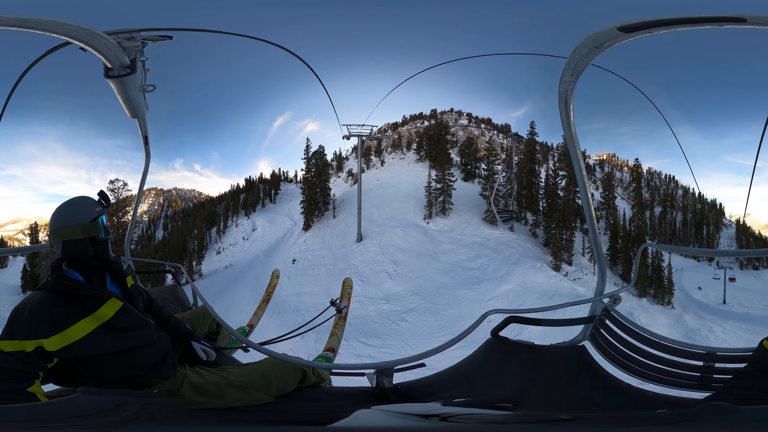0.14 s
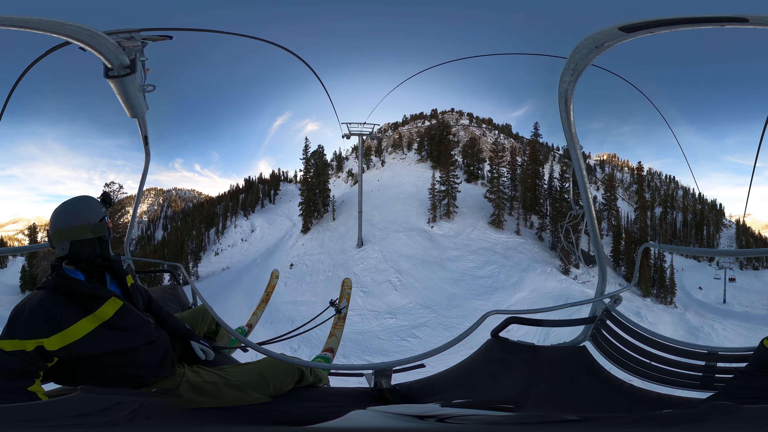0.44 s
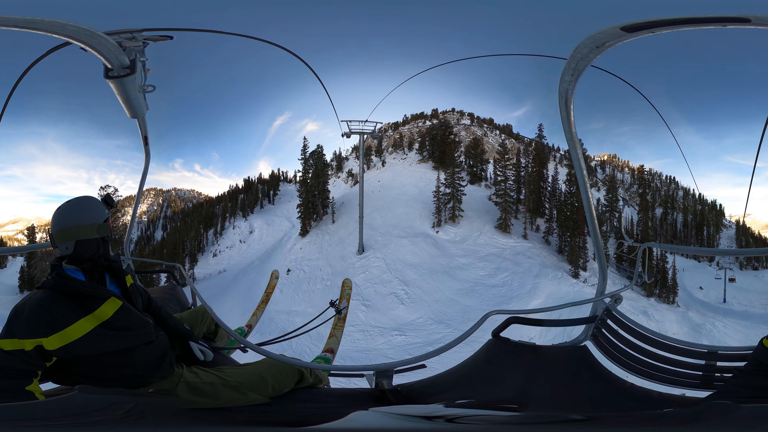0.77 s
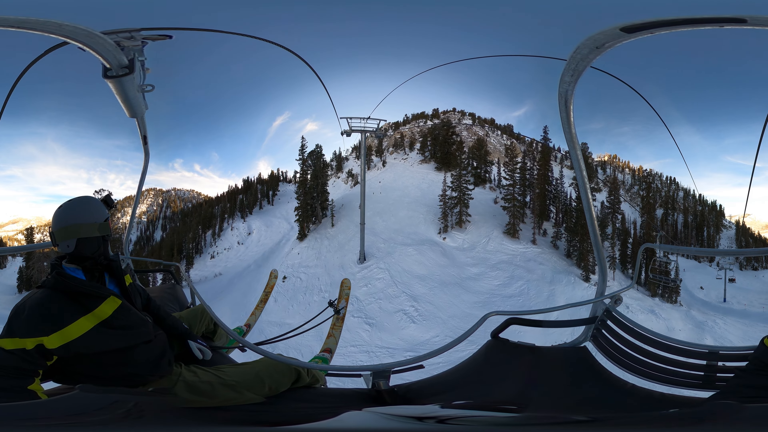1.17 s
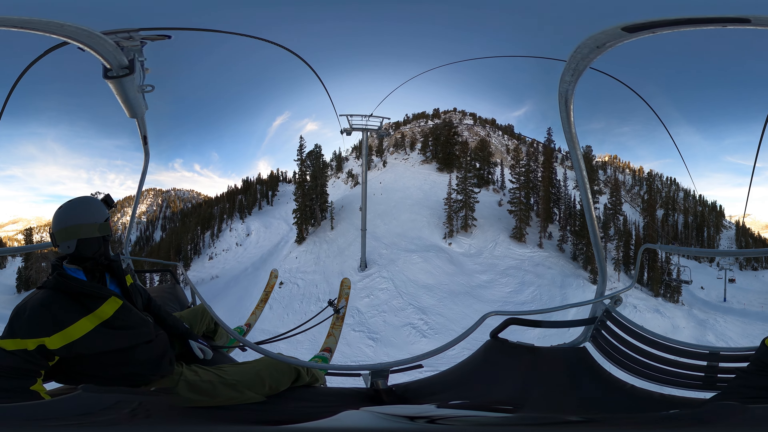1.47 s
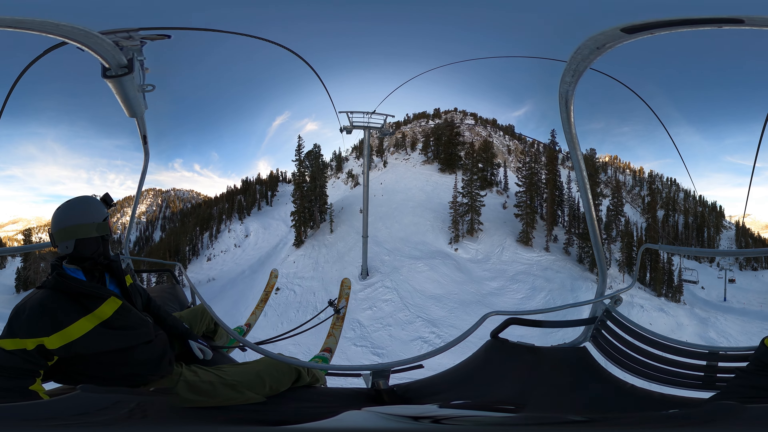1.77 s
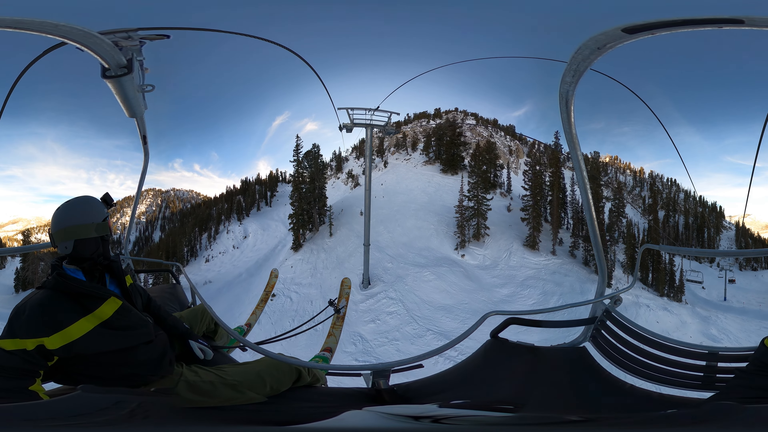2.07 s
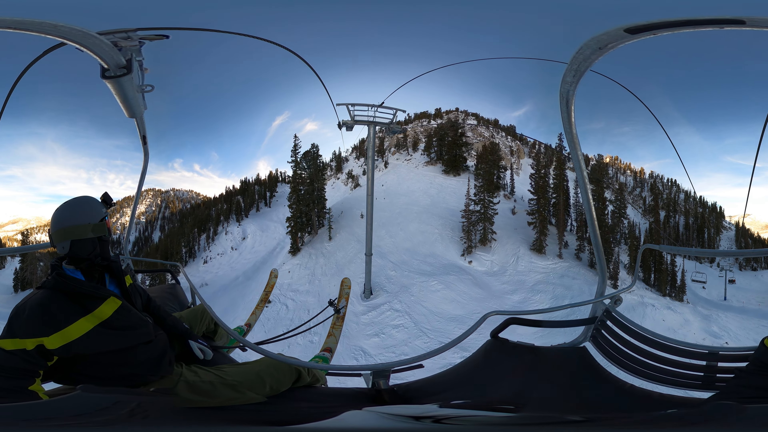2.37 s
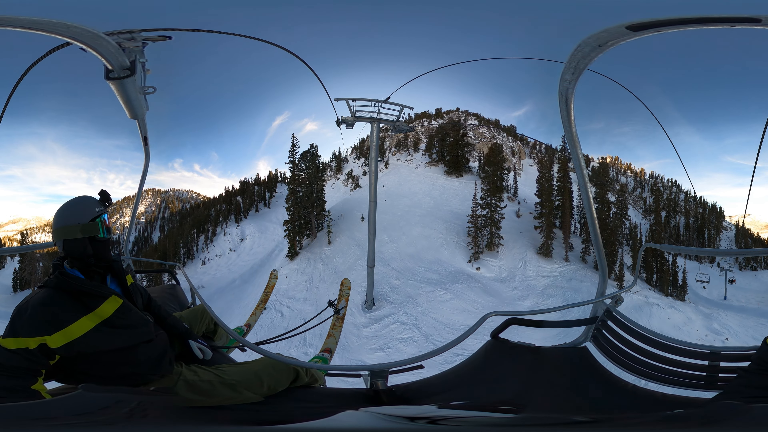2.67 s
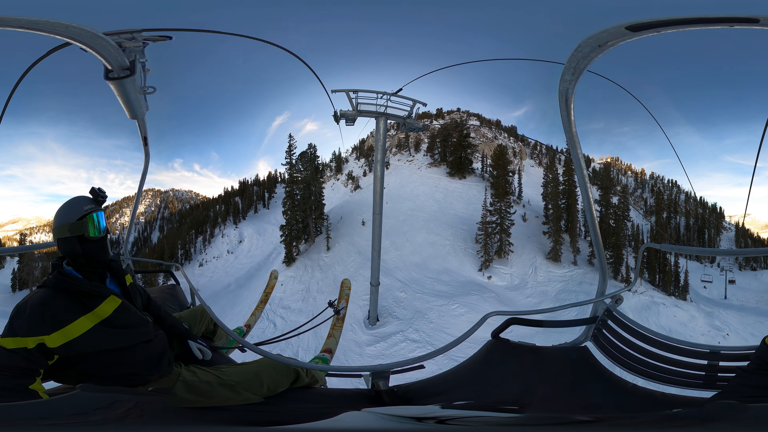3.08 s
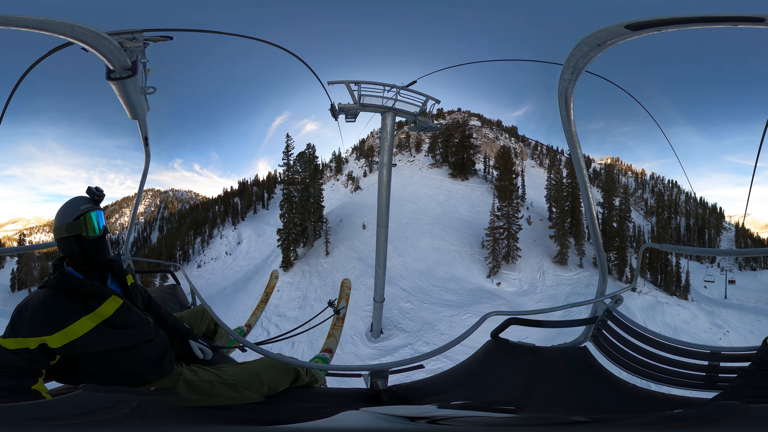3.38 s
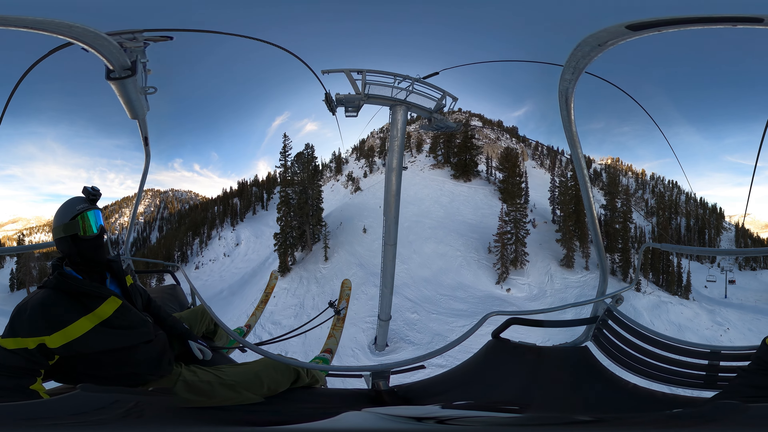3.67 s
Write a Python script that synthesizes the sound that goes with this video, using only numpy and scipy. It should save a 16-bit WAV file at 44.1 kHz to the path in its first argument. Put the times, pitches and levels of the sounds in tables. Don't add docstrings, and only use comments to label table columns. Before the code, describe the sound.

Wind thumps and rumbles against a microphone on a moving chairlift over a snowy slope; an early bar knock and cloth rustle, clustered metallic clacks near the middle, then roller hum swells as the tower nears.

```python
import sys
import numpy as np
from scipy import signal
from scipy.fft import rfft, irfft, next_fast_len
from scipy.io import wavfile
from scipy.ndimage import uniform_filter1d

SR = 44100
rng = np.random.default_rng(int(sys.argv[2]) if len(sys.argv) > 2 else 0)


def store_pcm(level_fs):
    pcm = np.round(np.clip(level_fs, -1, 1) * 32767).astype(np.int16)
    wavfile.write(sys.argv[1], SR, np.atleast_2d(pcm).T)


def convert_level_to_amplitude(level_db):
    exponent = np.asarray(level_db, float) / 20
    return 10 ** exponent


N = 168903


def evened(x):
    return x / np.sqrt(np.mean(x ** 2) + 1e-20)


def read(points, hz):
    f, value = np.transpose(points)
    return np.interp(np.log(hz + 1), np.log(f + 1), value)


def curve(rows, column=1):
    rows = np.array(rows)
    return np.interp(np.arange(N) / SR, rows[:, 0], rows[:, column])


def add(mix, s, sound):
    part = mix[max(round(s * SR), 0):][:len(sound)]
    part += sound[:len(part)]


def drift(top_hz):
    t = np.arange(0, N + 64, 64) / SR
    rates_hz = top_hz * np.geomspace(.06, 1, 24)
    slow = sum(np.sin(2 * np.pi * (f * t + rng.random())) / np.sqrt(f) for f in rates_hz)
    return evened(np.interp(np.arange(N) / SR, t, slow))


def noise(field_db, patch_db, flicker_db, size, wide, long):
    hop = size // 4
    frames, hz = N // hop + 5, np.fft.rfftfreq(size, 1 / SR)
    real, imaginary, patches = rng.standard_normal((frames, len(hz), 3)).T
    patches = evened(uniform_filter1d(uniform_filter1d(patches, wide, 0), long, 1))
    flicker = evened(uniform_filter1d(rng.standard_normal(frames), size=3))
    field = field_db(hz[:, None], np.arange(frames) * hop / SR)
    field = field + patch_db * patches + flicker_db * flicker
    spectra = (real + 1j * imaginary) * convert_level_to_amplitude(field)
    return signal.istft(spectra, nperseg=size, noverlap=size - hop)[1][:N]


def resonate(x, hz, width):
    turn, r = np.exp(2j * np.pi * hz * np.arange(len(x)) / SR), np.exp(-np.pi * width / SR)
    return 2 * (turn * signal.lfilter([1 - r], [1, -r], x / turn)).real


def steadied(x):
    smooth_s, share = .09, .6
    power = uniform_filter1d(x ** 2, int(smooth_s * SR))
    return evened(x / (power + 1e-12) ** (.5 * share))


# [t/s, buffet level/dB, flutter of the upper bass level/dB]
GUSTS = [(0.0, -51.5, -4), (0.08, -32, -18.5), (0.66, -31.5, -5), (0.69, -20, -17.5), (0.74, -30.5, -16.5),
         (1.11, -38, -7), (1.45, -32, -5.5), (2.04, -38.5, -15), (2.26, -29.5, -6), (2.31, -39, 2),
         (2.46, -27.5, -10), (2.51, -34.5, -6), (2.91, -37.5, -8), (3.09, -40.5, -3.5), (3.37, -35, -6.5),
         (3.42, -53, 13), (3.56, -42, -7.5), (3.83, -43.5, -2)]
# [f/Hz, level/dB per Hz]
BUFFET_COLOUR = [(4.7, -31), (8.0, -3), (27, 1), (66, -6), (117, -9), (174, -39.5), (218, -28), (278, -34),
                 (300, -13.5), (390, -44.5), (660, -120)]
SLAP_TIMES = [.238, .472, .498, .63, .685, 1.36, 1.47, 1.545, 1.71, 2.25, 2.45, 3.2, 3.37, .78, .56, .62,
              1.45, .3, 1.53, 2.12, .68, 2.31, 1.88]
# [level/dB, f/Hz]
SLAP_SOUNDS = [(-18.5, 62), (-17, 52), (-22, 55), (-25.5, 105), (-31.5, 13), (-25, 59), (-26.5, 105),
               (-19.5, 86.5), (-26.5, 56), (-23.5, 18), (-20.5, 47), (-26.5, 72), (-28, 45), (-43, 220),
               (-36, 126), (-32, 120), (-38.5, 150), (-27, 91), (-30, 110), (-34, 103), (-42, 85),
               (-28, 96), (-32, 68)]


def wind():
    lump_db, split_hz, slap_cycles, overload = .8, 85, .68, .15
    colour = lambda hz, s: read(BUFFET_COLOUR, hz) - 60 * np.clip(hz / 150 - 1.3, 0, 2) + 0 * s
    swirls = rfft(noise(colour, patch_db=2, flicker_db=0, size=4096, wide=3, long=3))
    low = 1 / (1 + (np.fft.rfftfreq(N, 1 / SR) / split_hz) ** 6)
    deep = steadied(irfft(swirls * low, N))
    flutter = steadied(irfft(swirls * (1 - low), N))
    level = convert_level_to_amplitude(curve(GUSTS) + lump_db * drift(14))
    out = level * (deep + convert_level_to_amplitude(curve(GUSTS, column=2)) * flutter)
    t = np.arange(N) / SR
    for s, (db, hz) in zip(SLAP_TIMES, SLAP_SOUNDS):
        shape = np.exp(-((t - s) * hz / slap_cycles) ** 2)
        out += convert_level_to_amplitude(db) * shape * np.sin(2 * np.pi * (hz * (t - s) + rng.random()))
    ending = np.clip((t[-1] - t) / .03, .2, 1)
    return overload * np.tanh(out / overload) * ending


# [t/s, level/dB, brightness/dB per octave]
ROLLING = [(0.0, -67.5, -0.9), (0.2, -70, -0.7), (0.45, -72.5, 0.5), (0.75, -74.5, -0.75),
           (1.17, -74.5, 1.1), (1.45, -67, -0.3), (1.62, -68.5, -0.8), (1.86, -69.5, -0.5),
           (2.27, -69.5, -0.76), (2.62, -70.5, 0), (3.23, -68, -0.55), (3.53, -70, -0.05),
           (3.83, -67, -1.5)]
# [f/Hz, level/dB per Hz]
ROLLING_COLOUR = [(140, 8), (260, 8), (520, -0.5), (900, -8), (1500, -7), (2600, -17), (6000, -23.5),
                  (8600, -35.5), (12000, -58)]


def roar():
    trim_db, mid_follow, mid_hz, mid_octaves = 10, .33, 1360, 1
    times, level_db, tilt = np.transpose(ROLLING)

    def field(hz, s):
        base = read(ROLLING_COLOUR, hz) - 40 * (hz < 120)
        slope = np.interp(s, times, tilt) * np.log2((hz + 50) / 1500)
        middle = np.exp(-(np.log2((hz + 1) / mid_hz) / mid_octaves) ** 2)
        return base + slope + mid_follow * (np.interp(s, times, level_db) - level_db.max()) * middle

    x = noise(field, patch_db=1.56, flicker_db=.5, size=1024, wide=8, long=6)
    return convert_level_to_amplitude(curve(ROLLING) + trim_db) * evened(x)


# [t/s, level/dB]
MAIN_HUM = [(0.0, -58), (0.04, -55.5), (0.86, -73), (0.91, -64), (1.0, -80.5), (1.16, -61.5), (1.39, -67.5),
            (1.63, -59.5), (1.66, -72), (2.28, -48.5), (2.47, -52), (3.26, -43.5), (3.79, -51.5),
            (3.83, -48.5)]
SWELL_TIMES = [2.3, 2.66, 3.08, 3.5, 2.22, 2.95, 1.85, 2.35, 2.76, 3.17, 1.2, 2.45, 2.97, 3.4, 3.75, 2.5,
               3.1, 3, 2.5, 1.2, 2.95, 3.24, 2.58, 2.2]
SWELL_MULTIPLES = [8, 8, 8, 8, 11, 11, 13, 13, 13, 13, 13, 12, 12, 12, 12, 9, 9, 18.03, 5, 6.87, 6.87, 6.87,
                   9.85, 10]
# [length/s, level/dB]
SWELL_SHAPES = [(0.17, -60), (.22, -66), (0.25, -64), (0.3, -74), (0.46, -72.5), (0.32, -83), (0.5, -79),
                (.08, -74), (.1, -72.5), (0.13, -74.5), (.1, -84), (.12, -73), (0.2, -74.5), (0.36, -74.5),
                (.12, -86.5), (0.15, -80), (0.27, -78), (.15, -76.5), (0.42, -72), (0.12, -83),
                (0.11, -71.5), (0.29, -66.5), (.06, -72), (0.22, -85)]


def rope():
    strands_hz, waver = 106.48, .0008
    hum_flicker_db, overtone_flicker_db = 1.4, 1.5
    fuzz_db, fuzz_width = -11, .015
    t = np.arange(N) / SR
    shake = rng.standard_normal(N)
    turns = 2 * np.pi * np.cumsum(strands_hz * (1 + waver * drift(3.057))) / SR
    out = np.sqrt(2) * convert_level_to_amplitude(curve(MAIN_HUM) + hum_flicker_db * drift(11)) * np.sin(3 * turns)
    for s, multiple, (length, db) in zip(SWELL_TIMES, SWELL_MULTIPLES, SWELL_SHAPES):
        shape = np.exp(-2 * ((t - s) / length) ** 2)
        level = np.sqrt(2) * convert_level_to_amplitude(db + overtone_flicker_db * drift(14))
        hz = multiple * strands_hz
        fuzz = convert_level_to_amplitude(fuzz_db) * evened(resonate(shake, hz, fuzz_width * hz))
        out += level * shape * (np.sin(multiple * turns) + fuzz)
    return out


# [f/Hz, width/Hz, level/dB]
TUBES = [(217.83, 5.6, -58.5), (360.4, 25, -63.5), (437.5, 39, -74), (511, 59, -72.5), (116.6, 14, -51.5),
         (741, 12, -80.5)]


def frame():
    follow = .54
    shake = rng.standard_normal(N)
    drone = np.zeros(N)
    for hz, width, db in TUBES:
        drone += convert_level_to_amplitude(db) * evened(resonate(resonate(shake, hz, width), hz, 3 * width))
    level_db = curve(ROLLING)
    return drone * convert_level_to_amplitude(follow * (level_db - level_db.max()))


# [t/s, level/dB]
HANGER_CLACKS = [(0.0595, -56), (.615, -65), (.788, -68), (0.9557, -59), (1.1385, -55), (1.267, -54),
                 (1.2989, -50), (1.4082, -53), (1.4452, -49.5), (1.4718, -58), (1.4855, -57), (1.5394, -53),
                 (1.5594, -52), (1.5823, -57), (1.6115, -54), (1.6336, -54), (1.6535, -56), (1.7155, -55),
                 (1.7888, -59), (1.925, -66), (1.9639, -58), (2.0393, -62), (2.168, -59), (3.6424, -68)]
# [f/Hz, level/dB, t60/s]
HANGER_MODES = [(1520, 0, .05), (1660, -1, .045), (1880, -5, .03), (2250, -9, .025), (2650, -8, .025),
                (3500, -9, .025), (4200, -17, .012), (5600, -24, .008), (1250, -12, .025)]


def clacks():
    trim_db, spread_db, detune, grit_share = .5, 1.5, .015, .5
    tick_db, scrape_s, rise_s = -2, .005, .0015
    out, t = np.zeros(N), np.arange(800) / SR
    hz, mode_db, t60 = np.transpose(HANGER_MODES)[:, :, None]
    for s, db in HANGER_CLACKS:
        tune, vary = rng.standard_normal((2, len(hz), 1))
        grit = rng.standard_normal(800)
        turns = hz * (1 + detune * tune) * t + grit[:len(hz), None]
        ring = (convert_level_to_amplitude(mode_db + spread_db * vary - 30 * t / t60) * np.sin(2 * np.pi * turns)).sum(0)
        ring *= 1 + grit_share * evened(uniform_filter1d(grit, size=40))
        ring *= np.cos(np.pi * t / t[-1] / 2)
        tick = convert_level_to_amplitude(tick_db) * uniform_filter1d(np.diff(grit, prepend=0), size=5) * np.exp(-t / scrape_s)
        hit = (ring + tick) * np.minimum(t / rise_s, 1)
        add(out, s, convert_level_to_amplitude(db + trim_db) * hit / abs(hit).max())
    return out


RUSTLE_TIMES = [.062, .244, .268, .389, .465, .193, .064, .11, .3, 1.64, 1.49, 3.2, 1.975, 2.2, 3.68, 2.52,
                .4, 1.42, 1.78, 3.48, 3.62, 3.5, .065, .445]
RUSTLE_LENGTHS = [.008, .02, .012, .016, .014, .01, .014, .1, .12, .04, .03, .12, .04, .09, .4, .05, .03,
                  .35, .12, .08, .45, .06, .012, .015]
# [level/dB, middle f/Hz, width/octaves]
RUSTLE_SOUNDS = [(-63.5, 1800, 0.89), (-68.5, 4500, .8), (-69.5, 2000, 0.92), (-69, 3800, 0.68),
                 (-73, 5500, 0.4), (-65.5, 1710, 0.11), (-50.5, 650, 0.19), (-78.5, 2830, 0.16),
                 (-76.5, 1700, 0.12), (-63.5, 1000, 0.4), (-68, 810, 0.89), (-65, 760, 0.55),
                 (-65.5, 1750, 0.54), (-72.5, 2230, 0.35), (-78.5, 3470, 0.25), (-68.5, 1250, 0.18),
                 (-58.5, 330, 0.65), (-75, 1300, 0.31), (-75.5, 2600, .4), (-70.5, 1370, 0.2),
                 (-83.5, 3000, 1), (-66.5, 620, 0.16), (-73, 3800, 0.65), (-75, 4100, 0.46)]


def rustles():
    out, size, t = np.zeros(N), next_fast_len(N), np.arange(N) / SR
    hz = np.fft.rfftfreq(size, 1 / SR) + 1
    grit = rfft(rng.standard_normal(size) * (1 + rng.exponential(1, size)))
    for s, length, (db, middle_hz, octaves) in zip(RUSTLE_TIMES, RUSTLE_LENGTHS, RUSTLE_SOUNDS):
        band = np.exp(-.5 * (np.log2(hz / middle_hz) / octaves) ** 2)
        puff = np.exp(-((t - s) / (length * np.where(t < s, .3, .9))) ** 2)
        out += convert_level_to_amplitude(db) * evened(irfft(grit * band, size)[:N]) * puff
    return out


# [t/s, level/dB]
BAR_KNOCKS = [
    (.0628, -39.5),
    (.0752, -50),
]
# [f/Hz, level/dB, t60/s]
BAR_MODES = [(614, 2.5, 0.041), (837, -13.5, 0.01), (410, -0.5, 0.036), (1340, -25, .02), (2400, -20, .015),
             (3560, -29, 0.011), (5100, -17, .012)]


def knocks():
    out, t = np.zeros(N), np.arange(3000) / SR
    ring = sum(convert_level_to_amplitude(db - 60 * t / t60) * np.sin(2 * np.pi * hz * t) for hz, db, t60 in BAR_MODES)
    for s, db in BAR_KNOCKS:
        add(out, s, convert_level_to_amplitude(db) * ring / abs(ring).max())
    return out


# [t/s, level/dB]
TINY_CRACKLES = [(0.1348, -96), (0.1348, -85), (0.1777, -87), (0.202, -80), (0.226, -76), (0.2335, -77),
                 (0.2445, -82), (0.3857, -86), (0.3912, -86), (0.4071, -83), (0.4336, -81),
                 (0.4391, -76), (0.4605, -77), (0.4655, -78), (0.6177, -72), (0.6231, -69),
                 (0.6551, -69), (0.671, -65), (0.6765, -74), (0.6895, -88.5), (0.6975, -72.5),
                 (0.7987, -100), (0.7987, -78), (0.8656, -81), (1.1295, -90), (1.2976, -91),
                 (1.3984, -83), (1.4069, -70), (1.4418, -78), (1.4657, -71), (1.6124, -86),
                 (1.7027, -99), (1.7027, -72), (1.7461, -87), (1.796, -90), (1.8658, -78), (2.0609, -86),
                 (2.1556, -88), (2.163, -79.5), (2.3482, -88.5), (2.4096, -74), (2.7004, -78),
                 (3.3484, -79), (3.365, -72), (3.6258, -93), (3.6293, -83)]


def crackles():
    trim_db = 5
    out = np.zeros(N)
    signs = rng.choice([-1., 1.], len(TINY_CRACKLES))
    for (s, db), sign in zip(TINY_CRACKLES, signs):
        add(out, s, sign * convert_level_to_amplitude(db + trim_db) * np.ones(1))
    return out


# [t/s, f/Hz]
TREBLE_EDGE = [(0, 7700), (.5, 7800), (.7, 6800), (1.2, 7220), (1.5, 7470), (2.2, 7760), (2.6, 7140),
               (3.2, 8020), (3.37, 6740), (3.45, 8530), (3.65, 9540), (3.83, 8600)]


def gated(x):
    wander_hz, gate_db = 520, -17.5
    hz, s, z = signal.stft(x, SR, nperseg=1024, boundary="odd")
    end_hz = np.interp(s, *np.transpose(TREBLE_EDGE)) + wander_hz * rng.standard_normal(len(s))
    faint = abs(z) < 4 * np.median(abs(z), axis=-1, keepdims=True)
    gain = convert_level_to_amplitude(gate_db * (hz[:, None] > end_hz) * faint)
    return signal.istft(z * gain, SR, nperseg=1024)[1][:, :N]


def scene():
    return (wind() + roar() + rope() + frame() + clacks() + rustles() + knocks())[None]


def band_limit(x):
    return signal.sosfilt(signal.butter(12, 19000, fs=SR, output="sos"), x)


def record(dry):
    edge_hz, hiss_db = 8900, -101
    taps = signal.firwin(255, edge_hz, window=("kaiser", 6), fs=SR)
    padded = np.pad(gated(dry), ((0, 0), (127, 127)), "reflect", reflect_type="odd")
    x = signal.oaconvolve(padded, taps[None], "valid")
    hiss = convert_level_to_amplitude(hiss_db) * rng.standard_normal(dry.shape)
    return band_limit(x + crackles() + hiss)


dry = scene()
out = record(dry)
store_pcm(out)
```